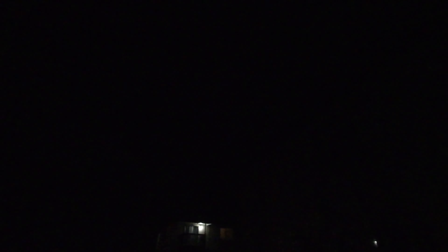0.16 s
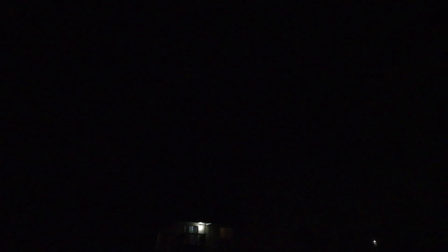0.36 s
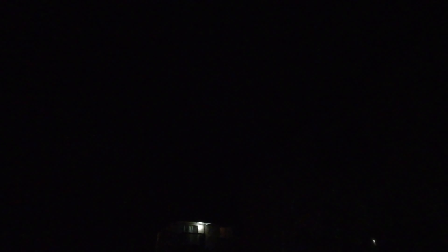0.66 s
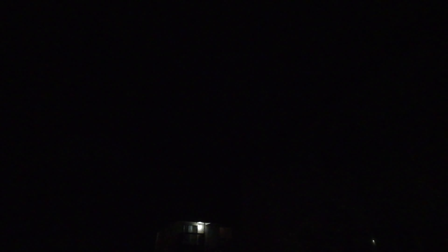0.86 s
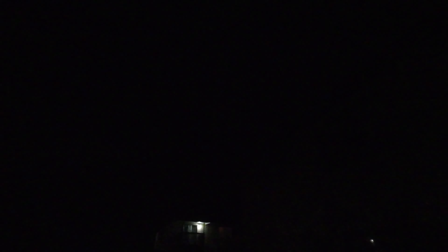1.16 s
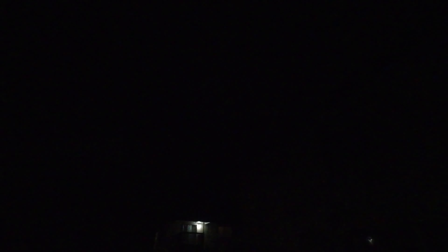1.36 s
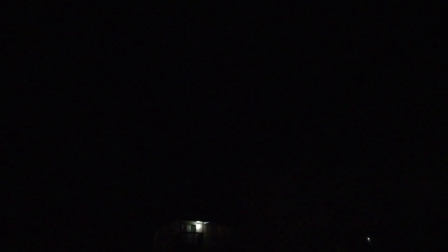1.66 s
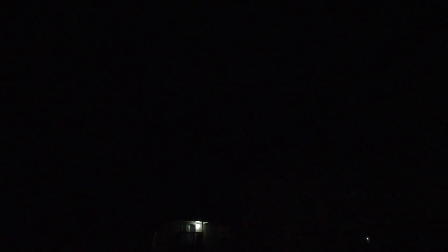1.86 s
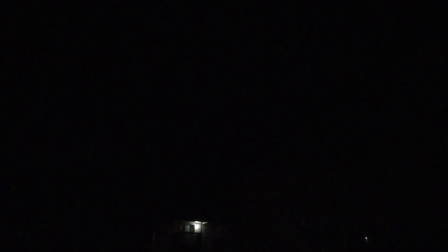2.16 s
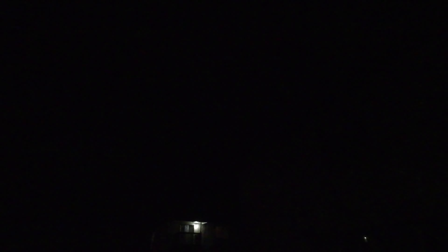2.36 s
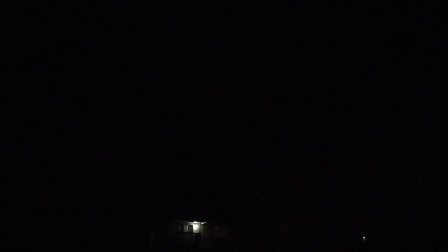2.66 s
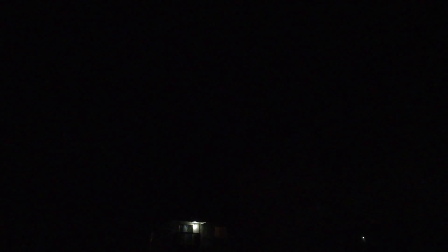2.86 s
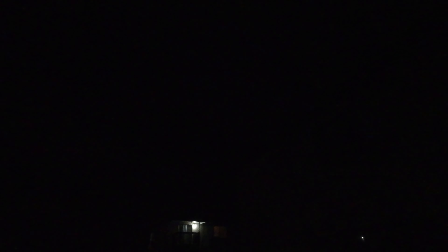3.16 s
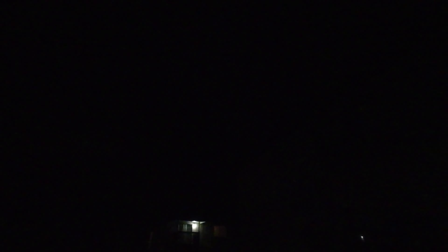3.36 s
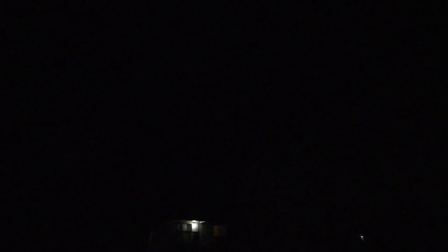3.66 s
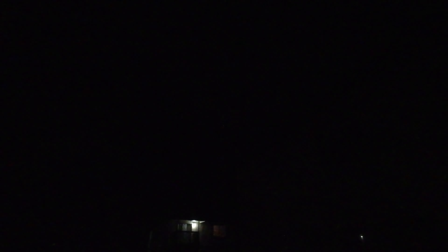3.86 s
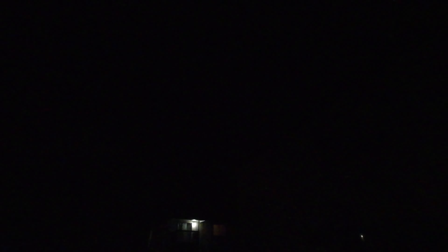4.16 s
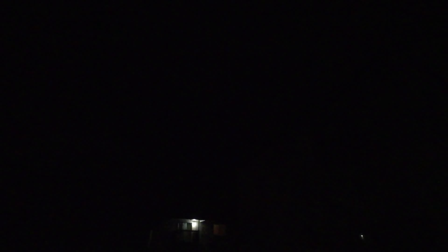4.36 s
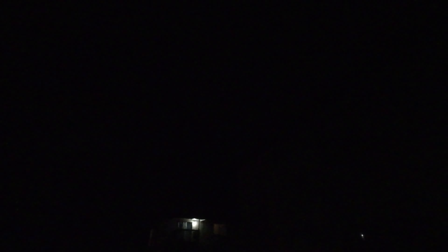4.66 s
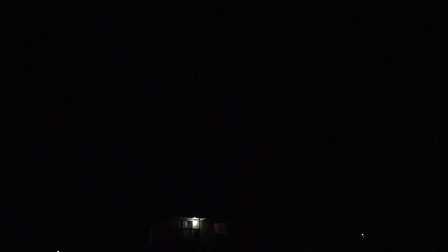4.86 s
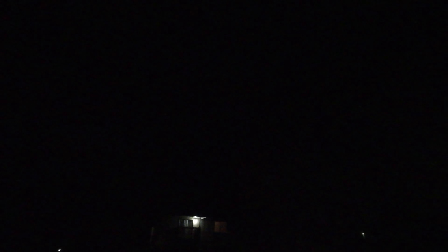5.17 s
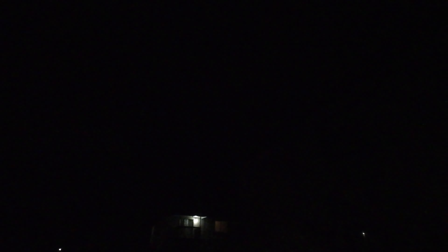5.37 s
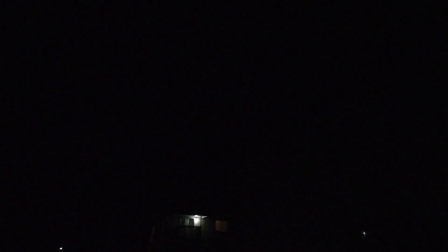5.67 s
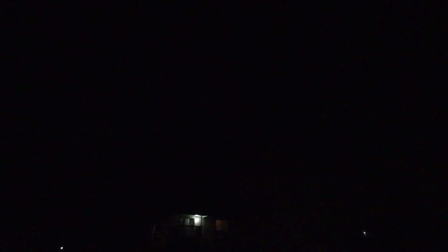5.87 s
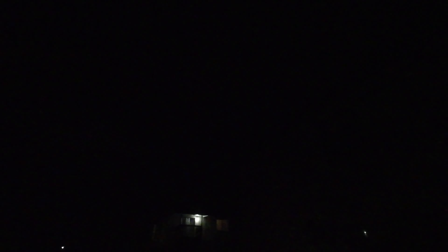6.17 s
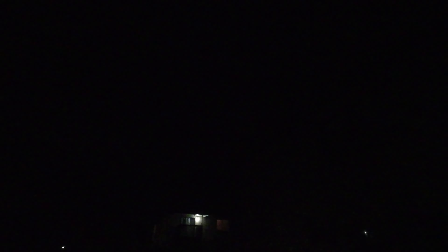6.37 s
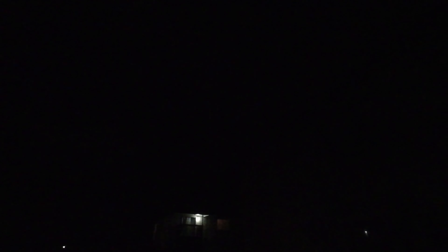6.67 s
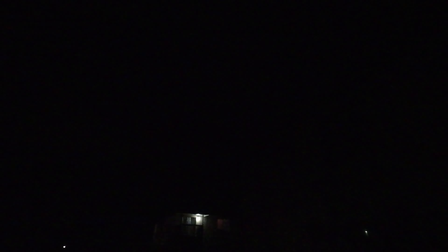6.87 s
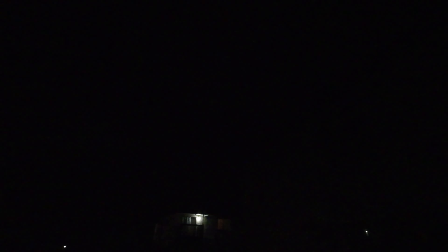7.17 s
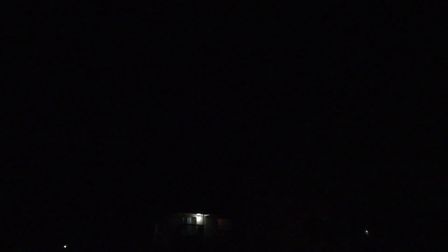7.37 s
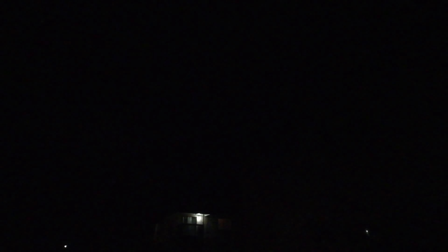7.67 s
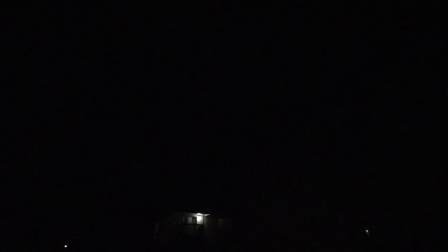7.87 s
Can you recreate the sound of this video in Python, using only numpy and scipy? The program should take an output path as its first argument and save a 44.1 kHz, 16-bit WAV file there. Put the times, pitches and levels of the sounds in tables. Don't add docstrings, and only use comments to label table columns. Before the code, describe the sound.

Very low far-off launch roar rolls through the night in uneven waves, under a steady nearby cooling unit's hiss and thin, high cricket chirps.

```python
import sys
import numpy as np
from scipy import signal
from scipy.fft import rfft, irfft, next_fast_len
from scipy.io import wavfile
from scipy.ndimage import uniform_filter1d, map_coordinates

SR = 44100
rng = np.random.default_rng(int(sys.argv[2]) if len(sys.argv) > 2 else 0)


def generate_wav(sig):
    pcm = np.round(np.clip(np.atleast_2d(sig).T, -1, 1) * 32767).astype(np.int16)
    wavfile.write(sys.argv[1], SR, pcm)


N = 353566
T = np.arange(N) / SR
TURN_HZ, EXHAUST_AT, EXHAUST_LENGTH = 58.574, .378, .5


def from_db(db):
    return 10 ** (np.asarray(db) / 20)


def rms_one(x):
    return x / np.sqrt(np.mean(x ** 2) + 1e-20)


def in_time(rows):
    s, *columns = np.transpose(rows)
    return [np.interp(T, s, column) for column in columns]


def frequency_grid():
    return np.fft.rfftfreq(next_fast_len(N), 1 / SR)


def at_hz(points):
    hz, value = np.transpose(points)
    return np.interp(np.log(frequency_grid() + 1), np.log(hz), value)


def humps(rows):
    hz = frequency_grid()
    return sum(db * np.exp(-((hz - centre_hz) / width_hz) ** 2) for centre_hz, width_hz, db in rows)


def colour(x, db):
    size = next_fast_len(N)
    return irfft(rfft(x, size) * from_db(db), size)[..., :N]


def drift(rate):
    knots = rng.standard_normal(int(rate * N / SR) + 3)
    return map_coordinates(knots, [T[::64] * rate], order=2).repeat(64)[:N]


def peak(x, hz, width_hz):
    r = np.exp(-np.pi * width_hz / SR)
    poles = [1, -2 * r * np.cos(2 * np.pi * hz / SR), r * r]
    return signal.lfilter([(1 - r * r) / 2, 0, (r * r - 1) / 2], poles, x)


# (frequency [Hz], density [dB per Hz])
AIR_COLOUR = [(88, -25), (150, -2.5), (232, -5), (283, -7), (470, -10.5), (902, -11), (1550, -19.5),
              (3040, -20), (3640, -22.5), (4610, -30.5), (5040, -28.5), (6500, -35), (11400, -41.5),
              (14800, -72), (22000, -120)]
# (frequency [Hz], level [dB])
AIR_SIDE = [(150, -23), (300, -24.5), (600, -27.5), (1200, -20), (2500, -18.5), (5500, -8.5), (11000, -6.5),
            (13000, -12), (14500, -3)]
# (frequency [Hz], width [Hz], level [dB])
HOUSING = [(680, 70, -0.5), (904, 116, 3), (3030, 240, -4), (3900, 170, 0.5), (4930, 210, 3),
           (5850, 190, 3.5), (7900, 500, 3), (8730, 630, -3), (9850, 610, 3.5), (11300, 400, 2.5)]
# (frequency [Hz], width [Hz], level [dB])
HISS_CHANGE = [(650, 100, -3.5), (1110, 110, 6), (2500, 360, 0), (4300, 250, 2.5)]
# (frequency [Hz], depth [dB])
EXHAUST_DEPTH = [(800, 0.2), (2000, -0.35), (3700, 0), (6000, -0.5), (10000, 0.5)]


def air():
    mid, side = colour(rng.standard_normal((2, N)), at_hz(AIR_COLOUR[:-2]) + humps(HOUSING))
    change = humps(HISS_CHANGE) / 2
    progress = T / T[-1]
    mid = (1 - progress) * colour(mid, -change) + progress * colour(mid, change)
    side = colour(side, at_hz(AIR_SIDE))
    steady = from_db(-46) * np.array([mid + side, mid - side]) / np.std(mid)

    exhaust = (T * TURN_HZ - EXHAUST_AT) % 1 < EXHAUST_LENGTH
    stroke = uniform_filter1d(2. * exhaust - 1, size=40)
    swing = np.sqrt(np.clip(from_db(2 * at_hz(EXHAUST_DEPTH)) - 1, 1e-6, None))
    puffs = colour(steady[:, ::-1], 20 * np.log10(swing))
    return steady + puffs * (1 + stroke) * from_db(0.88 * drift(40))


# (frequency [Hz], pitch waver [Hz], level [dB rms])
FAN_TONES = [(161.8, 2.65, -59), (218.4, 2.19, -58.5), (238.9, 0.64, -54.5), (245, 1.8, -77),
             (298.4, 1.94, -71.5), (327.7, 2.38, -63.5), (376.6, 2.38, -62), (412.4, 1.75, -63),
             (468, 1.37, -82), (541.6, 14, -63.5)]


def fan():
    out = 0
    for hz, width_hz, db in FAN_TONES:
        gain = np.sqrt(2) * from_db(db + 1.4 * drift(8))
        out = out + gain * np.sin(2 * np.pi * np.cumsum(hz + width_hz * drift(9)) / SR)
    return out


# (frequency [Hz], level [dB rms])
COMB = [(500, -77), (1000, -77), (1500, -80), (2600, -79), (3200, -81), (4400, -81), (4600, -88),
        (5000, -82), (5900, -84), (6200, -91), (7800, -89), (8050, -84), (8200, -96), (11000, -97)]
# (frequency [Hz], level [dB rms])
STRONG_PARTIALS = [(2697, -71), (2751, -73), (3338, -72), (3515, -72), (3575, -67), (3634, -74),
                   (3747, -73), (3806, -72), (3865, -70), (3924, -73), (3984, -78), (4043, -73),
                   (4102, -74), (4156, -78), (4215, -78), (4274, -77), (4334, -78), (4393, -75),
                   (4452, -81), (1055, -64), (1113, -66)]
# (time [s], level [dB])
VALVE_RING = [
    (0, -9),
    (2.3, -4),
    (5.4, -2),
    (5.7, -1),
    (8, -4),
]


def compressor():
    orders = np.arange(1, 201)
    hz, db = np.transpose(COMB)
    level_db = np.interp(orders * TURN_HZ, hz, db, left=-130, right=-130)
    level_db = level_db + rng.normal(0, 2.5, len(orders))
    for hz, db in STRONG_PARTIALS:
        level_db[round(hz / TURN_HZ) - 1] = db - .6
    place = (orders / 13 + rng.normal(0, .06, len(orders))) % 1
    arrival = EXHAUST_AT + EXHAUST_LENGTH * place
    phase = np.cumsum(arrival)
    partials = np.sqrt(2) * from_db(level_db) * np.exp(-2j * np.pi * phase)

    turns = (T * TURN_HZ + 0.003 * drift(4)) % 1
    group = rng.integers(0, 8, len(orders))
    group[131:139] = 8
    cycle = np.linspace(0, 1, 8193)
    out = 0
    for k in range(9):
        members = group == k
        one_turn = (np.exp(2j * np.pi * np.outer(cycle, orders[members])) @ partials[members]).real
        swell_db = 1.6 * drift(4) + (k == 8) * in_time(VALVE_RING)[0]
        out = out + np.interp(turns, cycle, one_turn) * from_db(swell_db)
    return out


def cricket(pulses, hz, pulse_s, flutter_db):
    envelope = np.zeros(N)
    for s, level_db in pulses:
        near = slice(max(round((s - .1) * SR), 0), round((s + .1) * SR))
        envelope[near] += from_db(level_db) * np.exp(-((T[near] - s) / pulse_s) ** 4)
    echo = from_db(-6) * np.roll(envelope, round(.045 * SR))
    envelope = np.maximum(envelope, echo)
    tone = np.sin(2 * np.pi * np.cumsum(hz + 14 * drift(30)) / SR)
    return np.sqrt(2) * envelope * tone * from_db(flutter_db * drift(220))


def far_cricket():
    chirps = np.arange(.1, 8, .33) + rng.normal(0, .015, 24)
    pulses = [(s + lag, -77 + 1.5 * rng.standard_normal()) for s in chirps for lag in (0, .045)]
    return cricket(pulses, hz=6870, pulse_s=.018, flutter_db=2)


# (time [s], first to last stroke [s], level [dB rms], growth to the last stroke [dB])
NEAR_CHIRPS = [(1.248, .046, -68, 2), (1.515, .073, -70, 0), (1.897, .043, -67, -9), (2.169, 0, -74, 0),
               (2.495, .048, -69, 0), (2.791, .075, -72, -3), (3.088, .055, -71, 1), (3.5, .051, -70, 2),
               (3.815, .049, -65, -2), (4.142, 0.034, -69, 2), (4.434, .062, -69, 2),
               (4.776, .049, -69, -2), (5.119, .048, -69, 3), (5.448, 0.044, -71, 5),
               (5.775, .076, -69, -3), (6.194, .05, -69, -3), (6.505, 0.034, -68, 1), (6.872, .049, -66, 0),
               (7.201, 0.089, -69, 1.5), (7.516, .046, -71, 4), (7.94, 0, -69, 0)]


def near_cricket():
    middle_at_s, middle_db = 0.042, 2
    pulses = []
    for s, length, level_db, growth_db in NEAR_CHIRPS:
        last_db = level_db + growth_db - 6 * (length < .01)
        pulses += [(s, level_db), (s + length, last_db)]
        if length > .07:
            pulses.append((s + middle_at_s, level_db + middle_db))
    chirps = cricket(pulses, hz=7195, pulse_s=.016, flutter_db=2.0)
    return chirps * from_db([[-1.1], [.9]])


# (time [s], peak level [dB])
TICKS = [
    (2.439, -50),
    (2.452, -56),
]


def twig():
    clicks = np.zeros(N)
    for s, level_db in TICKS:
        clicks[round(s * SR)] = from_db(level_db + 25)
    return peak(peak(clicks + 1e-18, 11000, 4000), 11500, 6000)


# (time [s], frequency [Hz], level [dB])
THUMP = (3.2, 195, -45)


def thump():
    s, hz, level_db = THUMP
    burst = peak(peak(rng.standard_normal(N), hz, 120), hz, 120)
    return from_db(level_db) * rms_one(burst) * np.exp(-((T - s - .03) / 0.027) ** 2)


# (time [s], frequency [Hz], level [dB])
DRONE = [
    (3.5, 112.1, -47),
    (3.8, 112, -59),
    (4.1, 116.1, -34),
    (4.44, 117.3, -44.5),
    (4.68, 116.7, -36.5),
    (4.9, 110, -59),
    (5.0, 113.9, -36),
    (5.3, 120, -42.5),
    (5.55, 119, -58),
]


def drone_gain():
    since_start = T - DRONE[0][0] + .15
    until_end = DRONE[-1][0] + .05 - T
    return np.clip(np.minimum(since_start, until_end) / .1, 0, 1) * from_db(in_time(DRONE)[1])


def drone():
    hz = in_time(DRONE)[0] + 1.22 * drift(10)
    return np.sqrt(2) * drone_gain() * np.sin(2 * np.pi * np.cumsum(hz) / SR)


# (frequency [Hz], peak level [dB], decay [s])
OPENING = (59.3, -14.5, 0.027)


def opening():
    hz, level_db, decay_s = OPENING
    return from_db(level_db) * np.cos(2 * np.pi * hz * T) * np.exp(-T / decay_s)


# (time [s], depth [dB])
LULLS = [(0.33, -3.5), (0.52, -2), (0.86, -4), (1.3, -5), (1.72, -4), (2.18, -6.5), (2.86, -3),
         (3.33, -5.5), (4.95, 0), (5.83, -3), (6.14, -3), (6.97, -4.5), (7.2, -2), (7.95, -4)]


def lulls():
    lull_s = 0.029
    depth_db = sum(db * np.exp(-((T - s) / lull_s) ** 2) for s, db in LULLS)
    return from_db(depth_db) * (1 - np.exp(-T / .012))


# (time [s], level [dB])
BED = [
    (0.0, -37),
    (1.33, -42.5),
    (2.67, -34.5),
    (4.0, -35.5),
    (5.33, -37),
    (6.67, -37.5),
    (8.0, -40),
]
# (time [s], frequency [Hz], peak level [dB], half length [s])
SWELLS = [(0.15, 50.5, -23, 0.22), (0.42, 47.3, -23, 0.056), (0.57, 52.6, -25.5, 0.038),
          (0.833, 50.5, -27.5, 0.35), (1.45, 29.2, -22, 0.36), (1.558, 73.5, -33.5, 0.25),
          (1.95, 29.5, -24, 0.12), (2.122, 81, -37.5, 0.23), (2.378, 33, -25.5, 0.1),
          (2.498, 130, -34.5, 0.032), (2.698, 46.7, -28, 0.12), (2.95, 59, -32.4, 0.3),
          (3.19, 29.4, -22.0, 0.23), (3.532, 130, -39.4, 0.14), (3.588, 38, -25.3, 0.126),
          (3.97, 53.5, -30, 0.13), (4.18, 28, -27, 0.099), (4.36, 52.6, -30.8, 0.099),
          (4.66, 52, -30.5, 0.083), (4.842, 32, -25, 0.072), (5.15, 47, -28, 0.095),
          (5.44, 68.1, -36.5, 0.27), (5.67, 33, -30.5, 0.087), (6.244, 43, -29, 0.026),
          (6.467, 64.6, -37.5, 0.13), (7.096, 54, -37, 0.051), (7.27, 103, -42, 0.091),
          (7.52, 49, -31.5, 0.17), (7.74, 26.6, -27.5, 0.097), (7.89, 130, -41, 0.189)]


def range_gain(hz, bed_db, rise_db):
    spread = 0.44
    slow = T[::64]
    power = from_db(2 * (in_time(BED)[0][::64] + bed_db + rise_db * slow))
    for s, swell_hz, level_db, half_s in SWELLS:
        reach = np.exp(-(np.log(hz / swell_hz) / spread) ** 2)
        power = power + from_db(2 * level_db) * reach * np.exp(-((slow - s) / half_s) ** 2)
    return np.sqrt(np.interp(T, slow, power))


# (frequency [Hz], density [dB per Hz])
RUMBLE_COLOUR = [(4.7, -30), (8.0, 0.5), (27, 7.5), (50, 4.5), (67, -2.5), (118, -20.5), (146, -29.5),
                 (190, -41.5), (250, -36), (420, -120)]
BED_RANGE_DB = [4, 0, -13, -16.5]
BED_RISE_DB_PER_S = [0.018, 0, 1.9, 1.28]
RUMBLE_SIDE_DB = [-28, -27, -26, -21]


def rocket():
    edges, centres = [(6, 30), (30, 55), (55, 90), (90, 190)], [18, 41, 70, 115]
    out = 0
    for band, hz, bed_db, rise_db, side_db in zip(edges, centres, BED_RANGE_DB, BED_RISE_DB_PER_S,
                                                  RUMBLE_SIDE_DB):
        noise = colour(rng.standard_normal((2, N)), at_hz(RUMBLE_COLOUR))
        band_pass = signal.butter(3, band, "band", fs=SR, output="sos")
        noise = signal.sosfiltfilt(band_pass, noise)
        power = uniform_filter1d(uniform_filter1d(noise[0] ** 2, size=4000), size=4000)
        evened = noise / np.sqrt(power + 0.35 * power.mean())
        mid, side = evened * range_gain(hz, bed_db, rise_db) * from_db(2.5)
        out = out + mid + from_db(side_db) * side * [[1], [-1]]
    return .36 * np.tanh(out * lulls() / .36)


def scene():
    far_roar = rocket() + opening() + thump() + drone() * from_db([[1], [-1]])
    cooling_unit = air() + compressor() + fan()
    return far_roar + cooling_unit + near_cricket() + far_cricket() + twig()


def top_cut(x):
    return signal.sosfilt(signal.butter(12, 15730, fs=SR, output="sos"), x)


# (frequency [Hz], level [dB])
PORTS = [(12, 0), (30, -5), (60, -0.5), (110, -0.8), (350, 1.34), (900, 0), (3600, 2.5), (6500, .5),
         (11000, -1.9)]
# (frequency [Hz], level [dB])
TOP_END = [(11400, 0.5), (12200, -10.5), (13000, -24), (13800, -16), (14800, -14), (15700, -13)]


def record(dry):
    tilt = at_hz(PORTS) / 2
    mix = colour(dry, at_hz(TOP_END) + np.array([tilt, -tilt]))
    return top_cut(mix)


dry = scene()
out = record(dry)
generate_wav(out)
```